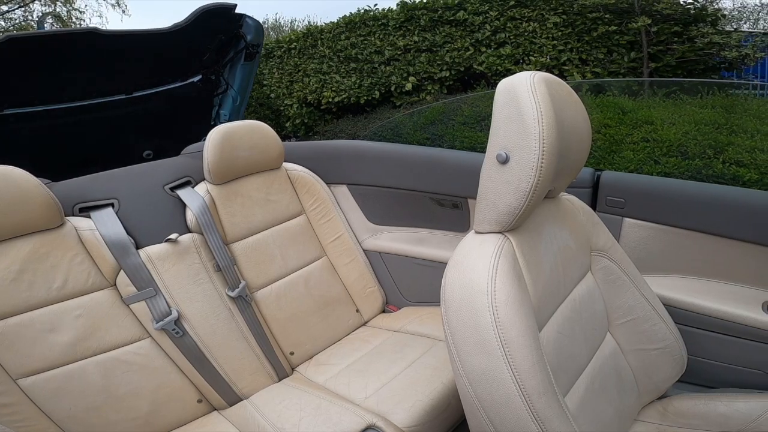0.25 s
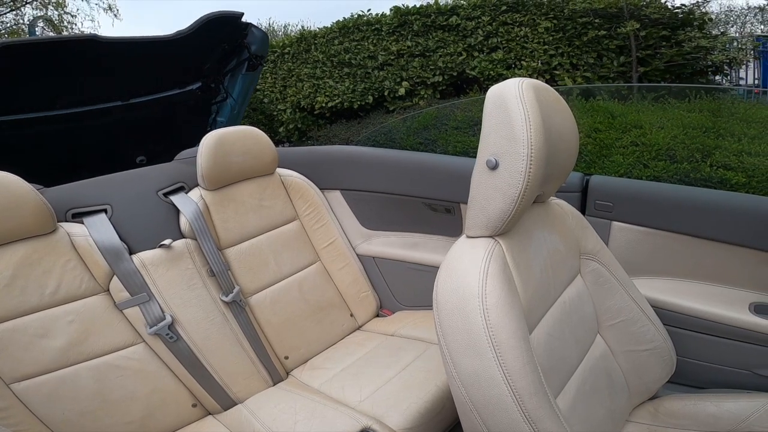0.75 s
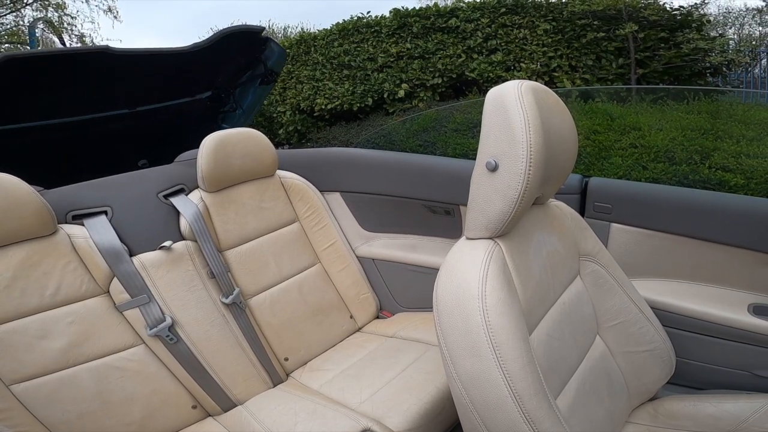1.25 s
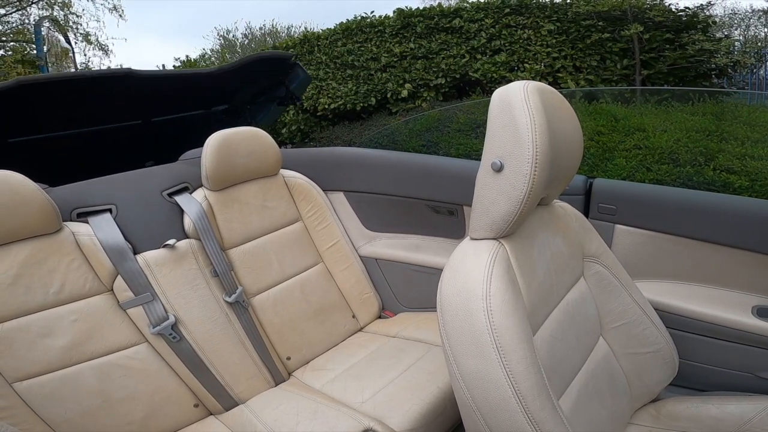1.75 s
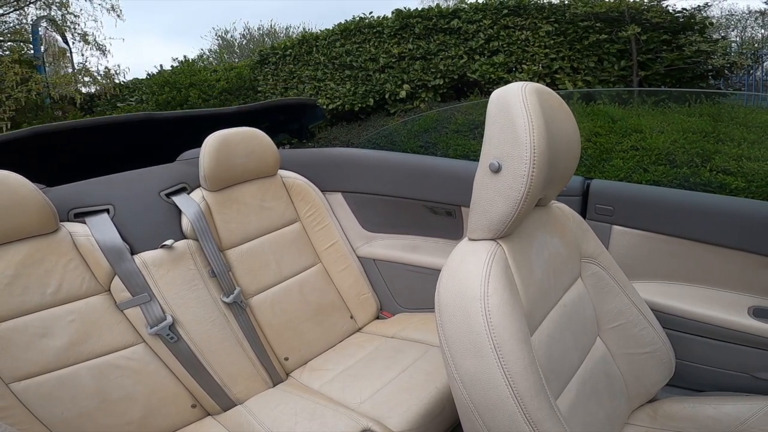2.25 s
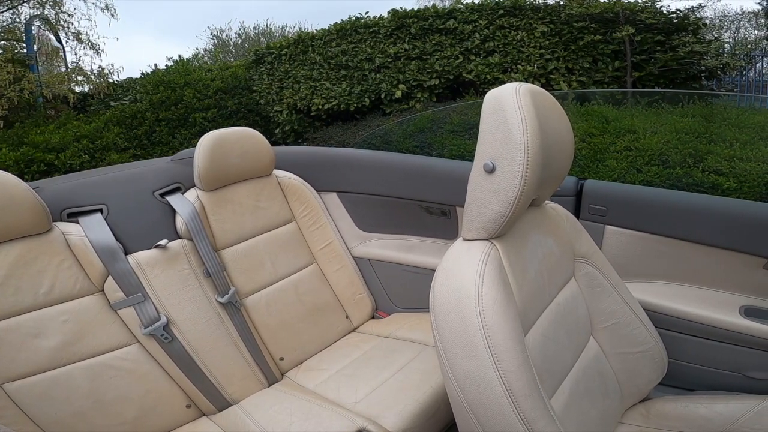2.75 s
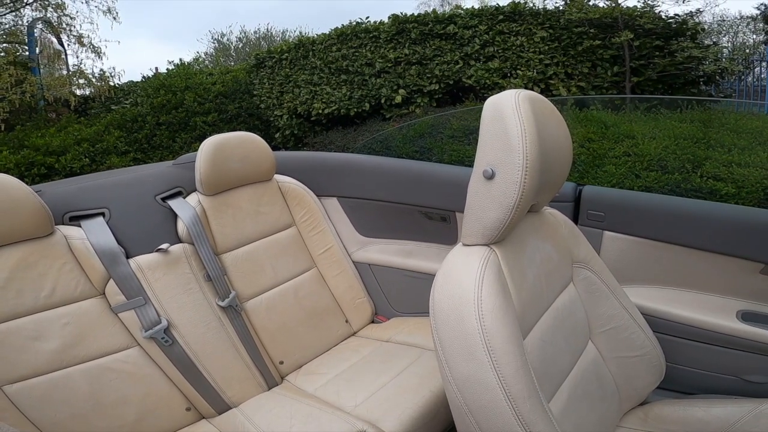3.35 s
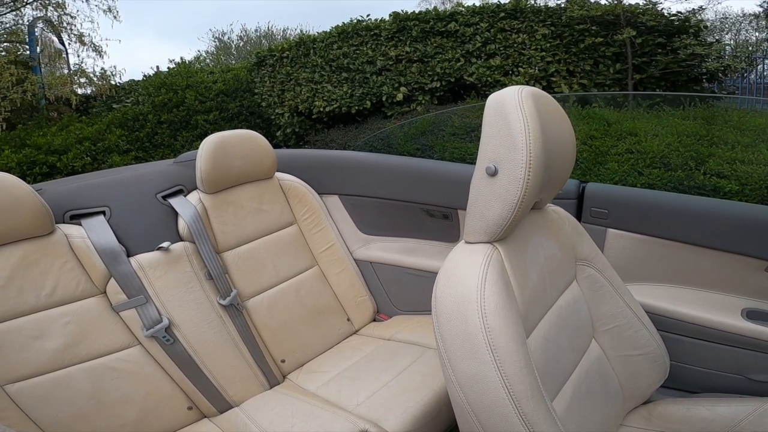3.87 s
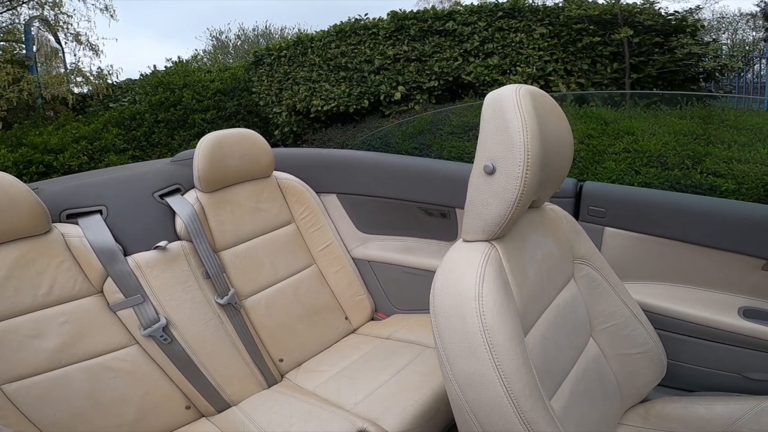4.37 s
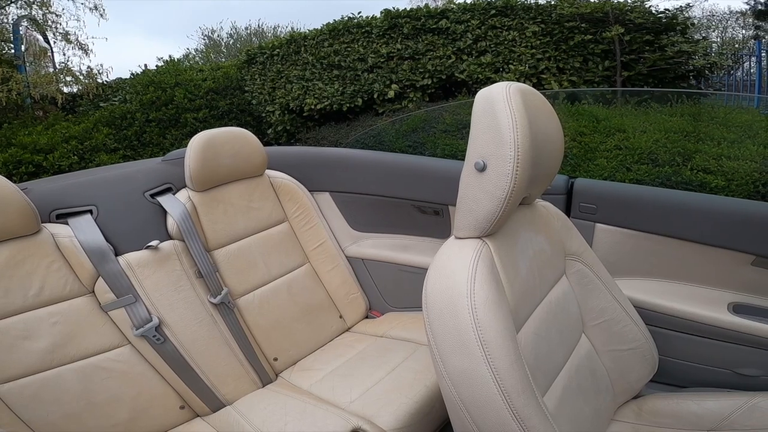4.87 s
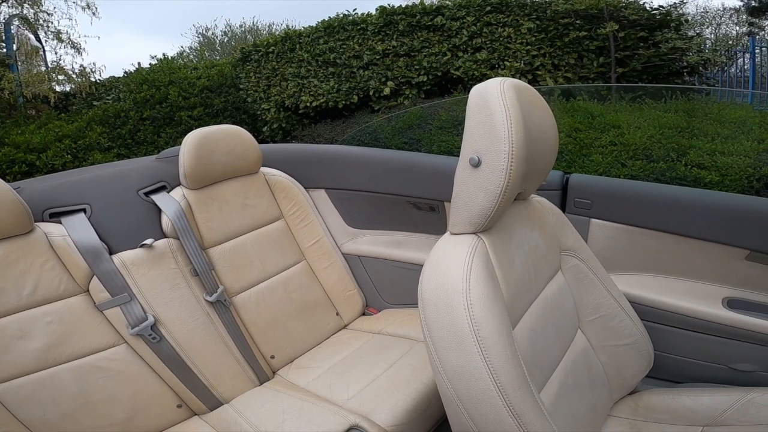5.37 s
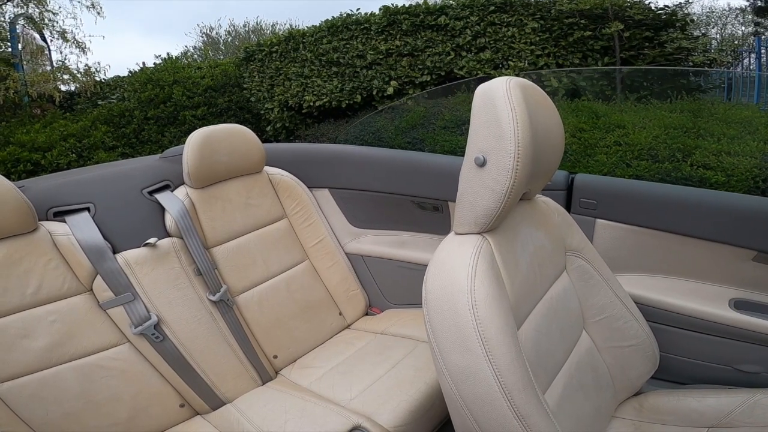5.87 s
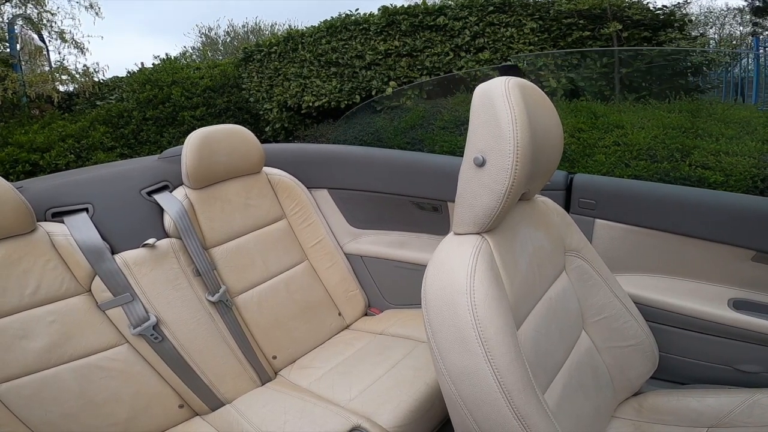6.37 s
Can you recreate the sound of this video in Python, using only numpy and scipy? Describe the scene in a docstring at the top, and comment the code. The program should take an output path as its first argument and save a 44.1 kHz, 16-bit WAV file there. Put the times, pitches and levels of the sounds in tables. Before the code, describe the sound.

A convertible's roof motors whine and hinges creak, the boot lid knocks shut, then a latch clunks and the windows slide up.

```python
"""A convertible closing up

Heard from the front seat, the engine idles while distant traffic fades and birds call faintly.
The roof motors whine and the hinges creak by stick-slip friction as the boot lid sinks; it drops
shut with a double knock, ringing in its modes, and is pulled tight. Then a latch grinds free
with a clunk, and motors slowing under load slide the side glass up in its seals."""
import sys
import numpy as np
from scipy import signal
from scipy.fft import rfft, irfft
from scipy.io import wavfile
from scipy.ndimage import uniform_filter1d

SR = 44100
rng = np.random.default_rng(int(sys.argv[2]) if len(sys.argv) > 2 else 0)


def materialize(psi):
    """Save the field psi as 16-bit PCM at rate SR to the path in sys.argv[1].

    A 1-D psi becomes a single channel; in a 2-D psi each row is a channel.
    """
    bounded = np.clip(np.atleast_2d(psi).T, -1, 1)
    quanta = np.round(bounded * 32767).astype(np.int16)
    wavfile.write(sys.argv[1], SR, quanta)


N = 292030
TIME = np.arange(N) / SR


def gain_of(db):
    """Amplitude ratio of a level in decibels."""
    return 10 ** (np.asarray(db) / 20)


def unit_rms(x):
    """Normalisation to rms 1."""
    return x / np.sqrt(np.mean(x ** 2) + 1e-20)


def spectrum_at(points, hz):
    """Interpolation on a log-frequency axis."""
    f, value = np.transpose(points)
    return np.interp(np.log(hz + 1), np.log(f + 1), value)


def add(mix, s, sound):
    """Superposition: a sound joins the mix at s seconds."""
    part = mix[..., max(round(s * SR), 0):][..., :sound.shape[-1]]
    part += sound[..., :part.shape[-1]]


def wander(rate_hz):
    """Slow random fluctuation: low-passed noise of rms 1."""
    hz = np.fft.rfftfreq(N, 1 / SR)
    return unit_rms(irfft(rfft(rng.standard_normal(N)) * np.exp(-(hz / rate_hz) ** 2), N))


def swelling(sound, rise_s):
    """Exponential build-up, as when a surface starts to slip."""
    return sound * (1 - np.exp(-np.arange(sound.shape[-1]) / SR / rise_s))


def edges_db(t, rise_s, fall_s):
    """Trapezoidal envelope: attack, hold and release."""
    return 20 * np.log10(np.clip(np.minimum((t - t[0]) / rise_s, (t[-1] - t) / fall_s), .01, 1))


# likeness of left and right for far and near sources (frequency [Hz], correlation [ratio])
SAME_FAR = [(60, 0.99), (250, 0.97), (500, 0.83), (1000, 0.79), (2000, 0.5), (4000, 0.057), (8000, 0.21),
            (12000, 0.81)]
SAME_NEAR = [(60, 0.92), (250, 0.97), (500, 0.96), (1000, .78), (2000, 0.16), (4000, 0.2), (8000, 0.2),
             (12000, .8)]
# left minus right (frequency [Hz], level [dB])
LEAN_FAR = [(60, -0.5), (400, -0.5), (1100, 0), (2000, 2.5), (5000, -1), (10000, -5.5)]
LEAN_NEAR = [(60, 0), (300, 0), (1000, 1), (2200, 4), (4500, -2.5), (10000, -2.5)]
def stereo(a, b, hz, far=False):
    """Partial coherence: two independent spectra mix into a partly alike left and right."""
    same, lean = (SAME_FAR, LEAN_FAR) if far else (SAME_NEAR, LEAN_NEAR)
    correlation = np.clip(spectrum_at(same, hz), -1, 1)
    mid, side = np.sqrt((1 + correlation) / 2) * a, np.sqrt((1 - correlation) / 2) * b
    tilt = gain_of(spectrum_at(lean, hz) / 2)
    return np.array([(mid + side) * tilt, (mid - side) / tilt])


def noise(colour, patchy_db, size, far=False):
    """Shaped stereo noise of rms 1, with drifting patches in time and frequency."""
    hz = np.fft.rfftfreq(size, 1 / SR)
    a, b, c, d, patches = rng.standard_normal((5, N * 4 // size + 5, len(hz)))
    patches = unit_rms(uniform_filter1d(uniform_filter1d(patches, size=7, axis=0), size=12, axis=1))
    shape = gain_of(spectrum_at(colour, hz) + patchy_db * patches)
    frames = stereo(a + 1j * b, c + 1j * d, hz, far) * shape
    _, wave = signal.istft(frames.swapaxes(1, 2), nperseg=size, noverlap=size * 3 // 4)
    return unit_rms(wave[:, :N])


def tone(rows, jitter, flutter_db, rate_hz, orders=((1, 0),)):
    """Randomly modulated partials along rows of (time [s], frequency [Hz], level [dB])."""
    times, pitches, levels = np.transpose(rows)
    out, t = np.zeros(N), np.arange(times[0], times[-1], 1 / SR)
    hz, db = np.interp(t, times, pitches), np.interp(t, times, levels)
    knots = rng.standard_normal((2, 4096))
    speed, flutter = (np.interp((t - t[0]) * rate_hz, np.arange(len(k)), k) for k in knots)
    turns = np.cumsum(hz * (1 + jitter * speed)) / SR
    wave = sum(gain_of(d) * np.sin(2 * np.pi * (k * turns + rng.random())) for k, d in orders)
    fade = np.clip(np.minimum(t - t[0], t[-1] - t) / .015, 0, 1)
    add(out, t[0], np.sqrt(2) * wave * gain_of(db + flutter_db * flutter) * fade)
    return out


# modes of the rear bodywork (frequency [Hz], level [dB], T60 [s])
PANEL_MODES = [(192, -6, 0.45), (273, 2, 0.15), (371.5, -6.5, 0.22), (498, -6.5, 0.45), (568, -10.5, 0.11),
               (617, -5, 0.38), (702, -9.5, .3), (785, -9.5, 0.4), (934, -2, 0.2), (1115, -3, 0.079),
               (1288, -4.5, 0.27), (1540, -3, 0.055), (1944, -3, .15), (2106, 1, 0.09), (2570, -4, 0.46),
               (3060, -6, 0.18), (4100, -3.5, 0.08), (4650, -5, 0.14)]
def strike(colour, t60, ring_db, tail_db, tail_t60, push_db=0, pitch=1, contact_s=.0001, size=16384):
    """Impact response: first contact, a dense burst, panel modes and scattering round the cabin."""
    t, hz = np.arange(size) / SR, np.fft.rfftfreq(size, 1 / SR)
    envelope = gain_of(-60 * t / t60) + gain_of(tail_db - 60 * t / tail_t60)
    burst = rng.standard_normal((2, size)) * envelope
    burst[0, 0] += gain_of(push_db)  # the first contact reaches both sides alike
    phases = rng.uniform(0, 2 * np.pi, (len(PANEL_MODES), 2, 1))
    ring = sum(gain_of(db - 60 * t / decay) * np.sin(2 * np.pi * f * t + phase)
               for (f, db, decay), phase in zip(PANEL_MODES, phases))
    spectrum = stereo(*rfft(burst + gain_of(ring_db) * ring), hz)
    spectrum /= np.sqrt(uniform_filter1d(np.mean(abs(spectrum) ** 2, 0), size=120))  # level broad bands
    log_gain = np.log(gain_of(spectrum_at(colour, abs(np.fft.fftfreq(size, 1 / SR)) / pitch)))
    causal = np.exp(np.conj(signal.hilbert(log_gain)))[:len(hz)]  # nothing sounds before the blow
    hit = irfft(spectrum * causal) * np.minimum(2 * (1 - t / t[-1]), 1) ** 4
    hit *= np.tanh(t / contact_s) ** 2  # soft contacts take a moment to build
    return hit / np.sqrt(np.sum(hit ** 2) / (2 * .01 * SR))  # the energy of 10 ms at rms 1


def knocks(rows, modes, contact_s):
    """Modal excitation: each knock rings the same modes, favouring those near its centre frequency."""
    out, t = np.zeros((2, N)), np.arange(SR // 4) / SR
    hz = np.fft.rfftfreq(len(t), 1 / SR)
    f, db, t60 = np.transpose(modes)[..., None]
    for s, level_db, centre_hz, rolloff in rows:
        mode_db = level_db + db - rolloff * abs(np.log2(f / centre_hz))
        envelope = gain_of(mode_db - 60 * t / t60) * np.tanh(t / contact_s)
        direct = (envelope * np.sin(2 * np.pi * f * t)).sum(0)
        scattered = (envelope * np.sin(2 * np.pi * (f * t + rng.random(f.shape)))).sum(0)
        add(out, s, irfft(stereo(rfft(direct), rfft(scattered), hz)))
    return out


# harmonics of the idle (multiple of the firing rate [ratio], level [dB])
IDLE_ORDERS = [(1, 0), (2, -16), (3, -19), (4, -21.5), (5, -26)]
# envelopes of the idle and of the exhaust of a vehicle moving off (time [s], level [dB])
IDLE_LEVEL = [(0, -53.5), (1.5, -40), (6.62, -38.5)]
DRONE_LEVEL = [(0, -32), (.45, -31), (.75, -36), (1.65, -40.5), (2, -49.5), (2.6, -58)]
def engines(firing_hz=33.48, drone_hz=43, sag_hz_per_s=1.352):
    """Beating: the idle's firing tone interferes with a fading exhaust drone close to it in pitch."""
    idle = tone([(s, firing_hz, db) for s, db in IDLE_LEVEL],
                jitter=.014, flutter_db=1.5, rate_hz=13, orders=IDLE_ORDERS)
    drone = tone([(s, drone_hz - sag_hz_per_s * s, db) for s, db in DRONE_LEVEL],
                 jitter=.0045, flutter_db=3, rate_hz=9.6, orders=[(1, -1.5), (2, -29), (3, -25)])
    return (idle + drone) * gain_of([[-.4], [.4]])


# spectrum of still air and the car's rumble (frequency [Hz], density level [dB])
AIR_SPECTRUM = [(12, -21.5), (28, -8), (48, 2), (62, -8.5), (100, -11.5), (180, -15), (300, -25.5),
                (450, -29.5), (720, -37.5), (1100, -39), (2000, -46), (3500, -66.5), (6500, -69),
                (10000, -88.5)]
def air():
    """Ambient noise: a low rumble that wavers slightly in level."""
    level = gain_of(-45 + .81 * wander(rate_hz=9.4))
    return level * noise(AIR_SPECTRUM, patchy_db=1, size=4096, far=True)


# spectrum of distant tyres (frequency [Hz], density level [dB])
TYRE_SPECTRUM = [(60, -1.5), (120, 12.5), (200, 4), (290, 5), (480, -0.5), (720, -4.5), (1000, 1),
                 (1600, -6), (2250, -12.5), (2900, -17.5), (4300, -24.5), (5500, -30), (7500, -36.5),
                 (10000, -57.5), (13000, -60.5)]
def traffic(nearest_s=.9, half_power_s=1.33, drop_s=4.38, drop_db=-2.5):
    """Inverse-square law: passing tyre noise fades with distance; later its level also steps down."""
    passing_db = -50.5 - 10 * np.log10(1 + ((TIME - nearest_s) / half_power_s) ** 2)
    step_db = drop_db * (1 + np.tanh((TIME - drop_s) / .06)) / 2
    level = gain_of(passing_db + step_db + .49 * wander(rate_hz=4.6))
    return level * noise(TYRE_SPECTRUM, patchy_db=1.4, size=1024, far=True)


# whine of the roof pump (time [s], frequency [Hz], level [dB])
PUMP_WHINE = [(0, 445.6, -59.5), (.45, 434, -61.5), (.9, 423, -67), (1.25, 422.5, -56.5),
              (1.65, 412.6, -55), (2.95, 401.2, -64), (3.6, 346, -74)]
# its harmonics (multiple [ratio], level [dB])
PUMP_ORDERS = [(1, -1.5), (2, -19), (5, -21.5)]
# further faint whines and hums, some from the pump itself (start [s], end [s], first pitch [Hz], last pitch
# [Hz], level [dB], fade [dB/s])
FAINT_WHINES = [(0, 1.147, 409, 406, -60.5, -1.5), (1.498, 2.699, 731, 706, -74.5, -4.5),
                (2.78, 3.2, 150.2, 137.8, -46, 16), (3.1, 5.55, 483.7, 475.5, -66.5, 4.5),
                (3.553, 5.603, 641, 630.6, -69.5, -0.5), (3.601, 5.599, 559.6, 552.5, -74.5, -1.5),
                (0, 0.647, 2195, 2178, -75.5, 2), (0, 0.702, 966, 960, -66.5, -1.5),
                (3.699, 5.55, 954, 950, -79.5, 0.5)]
def roof_motors(settling_power=1.368):
    """Pitch follows shaft speed: the pump slows under load, and the fainter whines sink and settle."""
    out = tone(PUMP_WHINE, jitter=.004, flutter_db=1.1, rate_hz=35, orders=PUMP_ORDERS)
    for start, end, first_hz, last_hz, db, fade in FAINT_WHINES:
        t = np.linspace(start, end, 200)
        hz = last_hz + (first_hz - last_hz) * np.linspace(1, 0, len(t)) ** settling_power
        level = db - fade * (t - start) + edges_db(t, rise_s=.1, fall_s=.1)
        out += tone(np.c_[t, hz, level], jitter=.005, flutter_db=2, rate_hz=35,
                    orders=[(1, -1), (2, -23)])
    return out


# spectrum of a rub (frequency [Hz], level [dB])
RUB_SPECTRUM = [(200, -3.5), (1000, 5), (1550, 11), (2400, -0.5), (3250, 4), (3900, -2), (4900, -5),
                (8000, -20.5), (11000, -41)]
def rub(rise_s, pitch):
    """Frictional slip: a burst that swells briefly before it dies."""
    burst = strike(RUB_SPECTRUM, t60=.09, ring_db=-24.5, tail_db=-18, tail_t60=.13, pitch=pitch)
    return swelling(burst, rise_s)


# spells of rustling (start [s], end [s], rub rate [1/s], base level [dB], fade [dB/s])
RUSTLES = [(0, 1.6, 45, -64, 2.5), (5.8, 6, 25, -74, -8)]
def rustle(spots=6, spread_db=5.5):
    """Poisson process: moving hinges and seals give tiny rubs at random instants."""
    out = np.zeros((2, N))
    for start, end, per_s, db, fade in RUSTLES:
        age = np.arange(0, end - start, 1 / SR)
        for chance, size in rng.random((spots, 2, N))[..., :len(age)]:
            slips = (spots * chance < per_s / SR) * gain_of(db - fade * age + spread_db * size)
            add(out, start, signal.oaconvolve(slips[None], rub(rise_s=.018, pitch=1.25), axes=1))
    return out


# creaks of hinges and seals (time [s], rub level [dB], rub pitch [ratio], swell [s],
# ring level [dB], ring pitch [Hz], snap level [dB])
CREAKS = [(0.016, -50.5, 1.13, 0.0013, -65, 4240, -79), (.252, -63, 1.3, 0.0053, -73.5, 3800, -77),
          (0.506, -57, 0.65, .004, -64, 4100, -76), (.722, -54, 1.1, .008, -58, 3700, -71),
          (0.891, -54, .85, .003, -68, 2890, -70), (1.003, -53, 0.84, 0.0017, -53.5, 3250, -68),
          (1.0306, -61, .98, .001, -66, 3400, -78), (1.0862, -53, 0.86, .002, -66, 2670, -72),
          (1.176, -56, .8, .002, -57.5, 2960, -84), (1.2057, -54.5, 0.73, .002, -60, 3127, -80),
          (1.3736, -55.5, 0.78, .001, -61, 2920, -77), (1.52, -59, 0.87, .001, -59, 3080, -73.5),
          (1.9432, -65, 0.93, .001, -74, 4750, -75), (2.3053, -58, 0.76, 0.0018, -77, 2979, -75),
          (2.624, -65, .93, .001, -63, 2920, -80), (2.805, -63, 1, .02, -76, 3000, -62),
          (3.289, -61.5, 0.73, .001, -69, 3400, -86), (3.565, -68, 0.78, 0.0029, -70.5, 3130, -90),
          (4.359, -68, 0.64, .001, -84, 3900, -83)]
# spectrum of a slipping joint's snap (frequency [Hz], level [dB])
SNAP_SPECTRUM = [(500, -8.5), (3000, -5.5), (5000, 2.5), (7000, -6), (9000, -21), (12000, -42)]
# modes of a steel link (multiple of the ring pitch [ratio], level [dB], T60 [s])
LINK_MODES = [(.46, -2, 0.12), (1, 2.5, 0.054), (1.09, -6.5, .05), (1.62, -11.5, 0.035)]
def creaks():
    """Stick-slip friction: a joint rubs, snaps free and sets a steel link ringing."""
    out, t = np.zeros((2, N)), np.arange(SR // 4) / SR
    for s, rub_db, pitch, swell_s, ring_db, ring_hz, snap_db in CREAKS:
        add(out, s, gain_of(rub_db) * rub(swell_s, pitch))
        snap = strike(SNAP_SPECTRUM, t60=.051, ring_db=-41.5, tail_db=-15, tail_t60=.12)
        add(out, s, gain_of(snap_db) * swelling(snap, swell_s))
        for ratio, mode_db, t60 in LINK_MODES:
            phase = 2 * np.pi * (ring_hz * ratio * t + rng.random((2, 1)))
            add(out, s, swelling(gain_of(ring_db + mode_db - 60 * t / t60) * np.sin(phase), swell_s))
    return out


# jolts of the hinge arms (time [s], level [dB], centre [Hz], roll-off [dB/octave])
ARM_KNOCKS = [(.508, -52, 1100, 8), (.724, -50, 1500, 4), (.897, -52, 1800, 4), (1.003, -52, 950, 5),
              (1.088, -52, 700, 4), (1.376, -55, 1700, 6)]
# modes of an arm (frequency [Hz], level [dB], T60 [s])
ARM_MODES = [(696, -5, .08), (853, -1, 0.079), (978, 0.5, .11), (1265, -3.5, 0.071), (1644, -1.5, .15),
             (2150, -9.5, .06)]
def hinge_arms():
    """Free vibration: the arms ring after each jolt of the sinking lid."""
    return knocks(ARM_KNOCKS, ARM_MODES, contact_s=.003)


# course of a squeal (time [s], frequency [Hz], squeal level [dB], rough rub level [dB])
SQUEAL = [(1.33, 1932, -78, -71), (1.445, 1976, -74, -71), (1.465, 2006, -66, -68), (1.525, 2045, -65, -68),
          (1.548, 2080, -70, -74), (1.59, 2093, -61, -76), (1.635, 2130, -64, -73), (1.662, 2150, -76, -79)]
def hinge_squeal():
    """Self-excited vibration: a hinge rubs, catches and squeals, rising as it is pushed harder."""
    squeal = tone([(s, hz, db) for s, hz, db, _ in SQUEAL], jitter=.011, flutter_db=2, rate_hz=200)
    rough = tone([(s, hz, db) for s, hz, _, db in SQUEAL], jitter=.045, flutter_db=4, rate_hz=450)
    return squeal + rough


# blows of lid, latches and the rising side glass (time [s], thud level [dB], thud pitch [ratio], clack level
# [dB], # clack pitch [ratio], tick level [dB])
BLOWS = [(2.7118, -46.5, 1.43, -60, 0.82, -56.5), (2.7159, -45, 1.1, -59, 0.66, -79),
         (2.726, -34.5, 0.9, -56, 0.83, -63), (2.7708, -42, 1.1, -60, 0.58, -76),
         (2.7785, -43, 0.85, -54, .62, -85), (2.802, -41, 0.55, -68, .6, -74),
         (2.8289, -45.5, 0.68, -85, 1, -67), (3.005, -45.5, 0.55, -74, .8, -90),
         (3.136, -40.5, 0.6, -56, 0.62, -76), (5.5714, -38.5, 1.14, -48.5, 0.93, -76),
         (5.5925, -38.5, 0.9, -53, 1.2, -67), (5.612, -40, .62, -68, 0.96, -82),
         (6.411, -50.5, 1.25, -66, 0.79, -72), (6.4222, -54, 1.4, -59, 0.56, -68),
         (6.4541, -50, 0.9, -56, 0.89, -67)]
# spectra of the three parts of a blow (frequency [Hz], level [dB])
THUD_SPECTRUM = [(60, -23), (130, -23.5), (200, 6.5), (280, 3.5), (480, -2), (750, -11.5), (1200, -14.5),
                 (2000, -44.5), (4000, -43.5), (9000, -75), (13000, -89)]
CLACK_SPECTRUM = [(200, -19), (700, 11.5), (1400, 0.5), (2100, 10), (3000, -1.5), (4500, -5), (6500, -27),
                  (9000, -42), (13000, -54.5), (20000, -84)]
TICK_SPECTRUM = [(500, 6.5), (2000, -8), (3500, 2), (5000, -1.5), (8000, -9.5), (10000, -25), (13000, -41)]
def body_blows():
    """Impact radiation: struck bodywork gives a dull thud, a hard clack and a sharp tick."""
    out = np.zeros((2, N))
    for s, thud_db, thud_pitch, clack_db, clack_pitch, tick_db in BLOWS:
        thud = strike(THUD_SPECTRUM, t60=.05, ring_db=-21.5, tail_db=-12.5, tail_t60=.26,
                      push_db=22.5, pitch=thud_pitch, contact_s=.00061)
        clack = strike(CLACK_SPECTRUM, t60=.045, ring_db=-18, tail_db=-31, tail_t60=.16,
                       push_db=8, pitch=clack_pitch)
        tick = strike(TICK_SPECTRUM, t60=.014, ring_db=-39, tail_db=-8, tail_t60=.1)
        add(out, s, gain_of(thud_db) * thud + gain_of(clack_db) * clack + gain_of(tick_db) * tick)
    return out


# landings of the boot lid (time [s], level [dB], centre [Hz], roll-off [dB/octave])
LID_KNOCKS = [(2.7119, -31, 1400, 2), (2.7275, -38, 1500, 5), (2.7708, -32, 420, 0.5),
              (2.7805, -32.5, 230, 10)]
# modes of the lid (frequency [Hz], level [dB], T60 [s])
LID_MODES = [(210.5, -0.5, .07), (286, -1, 0.05), (332, -5.5, 0.045), (434, -1.5, 0.094), (618, -20, .1),
             (790, -14.5, .1), (917, -10, 0.074), (1080, -21, 0.056), (1230, -21, .04), (1483, -19, .09),
             (1550, -19, 0.087)]
def boot_lid():
    """Panel resonance: the lid rings hollowly as it lands, rattles and drops home."""
    return knocks(LID_KNOCKS, LID_MODES, contact_s=.0012)


# heavy blows (time [s], level [dB])
HEAVES = [(2.799, -25), (5.585, -26)]
# modes of the body on its springs (frequency [Hz], level [dB], T60 [s])
BODY_MODES = [(41.1, 0.5, 0.46), (76.2, -9, 0.23), (105.4, -9, 0.32), (130.7, -14.5, 0.4)]
def body_heave():
    """Damped mass-spring oscillation: the body sways and booms after a heavy blow."""
    out, t = np.zeros(N), np.arange(SR // 2) / SR
    sway = sum(gain_of(db - 60 * t / t60) * np.sin(2 * np.pi * hz * t) for hz, db, t60 in BODY_MODES)
    for s, db in HEAVES:
        add(out, s, gain_of(db) * swelling(sway, rise_s=.014))
    return out


# calls (start [s], length [s], nominal pitch [Hz], nominal glide [Hz], level [dB], warble [ratio])
BIRD_CALLS = [(3.937, 0.34, 2735, 90, -76.5, .028), (4.19, .2, 2780, -200, -81.5, .055),
              (4.69, 0.23, 5540, 605, -87, .035), (5.037, .14, 5830, 350, -88, .035),
              (5.235, .08, 7400, 79.5, -90, .04)]
def birds(detune=.979, echo_t60=.22, direct_db=-12, echo_db=-3.5):
    """Diffuse reflection: far gliding whistles arrive mostly as echoes from hedge and trees."""
    calls, t = np.zeros(N), np.arange(SR // 3) / SR
    progress = np.linspace(.01, .99, 50)
    arch_db = 10 * np.log10(np.sin(np.pi * progress))
    for start, length, hz, glide_hz, db, warble in BIRD_CALLS:
        rows = np.c_[start + length * progress, hz + glide_hz * progress, db + arch_db]
        calls += tone(rows, jitter=warble, flutter_db=3, rate_hz=450, orders=[(detune, 0)])
    scatter = unit_rms(rng.standard_normal((2, len(t))) * gain_of(-60 * t / echo_t60)) / np.sqrt(len(t))
    echoes = signal.oaconvolve(calls[None], scatter, axes=1)[:, :N]
    return gain_of(direct_db) * calls + gain_of(echo_db) * echoes


# spectrum of glass rubbing in its seals (frequency [Hz], density level [dB])
SLIDE_SPECTRUM = [(40, 15), (100, 8.5), (200, 1.5), (400, 7), (520, 0), (700, 1), (870, 2), (1350, -0.5),
                  (1900, -7), (2800, -7.5), (4300, -12), (6000, -20), (7800, -23), (10000, -37),
                  (12500, -42)]
def glass_slide(start_s=5.52, seal_s=6.36, seal_width_s=.15, seal_db=3.5):
    """Sliding friction: the glass hisses, rubbing harder for a moment as it meets the top seal."""
    slide_db = -57.5 + seal_db * np.exp(-((TIME - seal_s) / seal_width_s) ** 2)
    moving = np.clip((TIME - start_s) / .019, 0, 1)
    level = moving * gain_of(slide_db + .54 * wander(rate_hz=49))
    return level * noise(SLIDE_SPECTRUM, patchy_db=.95, size=1024)


# modes of the latch hook (frequency [Hz], level [dB], T60 [s])
HOOK_MODES = [(1050, -7.5, 0.081), (1490, -8.5, 0.046), (1962, -1, 0.059), (2136, 1, 0.045),
              (2184, -2, 0.05), (2580, -9, 0.042), (2860, -9.5, 0.053), (3960, -15, 0.045),
              (4500, -20, .04)]
def latch(spring_s=5.532, spring_hz=3940, spring_t60=.022, hook_s=5.5915, left_db=9.5):
    """Damped ringing: the spring pings as the latch lets go, then the hook cracks against its stop."""
    out, t = np.zeros((2, N)), np.arange(SR // 5) / SR
    ping = gain_of(-55.5 - 60 * t / spring_t60) * np.sin(2 * np.pi * spring_hz * t)
    add(out, spring_s, np.tanh(t / .001) * ping)
    pan = gain_of([[left_db / 2], [-left_db / 2]])
    for hz, db, t60 in HOOK_MODES:
        phase = 2 * np.pi * (hz * t + rng.random() + .41 * rng.random((2, 1)))
        envelope = gain_of(-36.5 + db - 60 * t / t60) * np.tanh(t / .0006)
        add(out, hook_s, pan * envelope * np.sin(phase))
    return out


# drags of the latch (start [s], peak [s], level [dB], rise [dB/s], fall [dB/s], pitch [ratio])
GRINDS = [(5.54, 5.576, -42, 230, 450, 0.68), (5.541, 5.601, -43, 270, 560, 1.54),
          (5.61, 5.621, -44.5, 600, 270, 0.51)]
# spectrum of the grinding (frequency [Hz], density level [dB])
GRIND_SPECTRUM = [(150, -12), (400, -2), (900, 0), (1500, -3), (2200, -9.5), (3200, -17), (5000, -36),
                  (9000, -62)]
def latch_grind(slips_per_s=3000):
    """Shot noise: dense tiny slips build up and die away as the latch drags free."""
    out, t = np.zeros((2, N)), np.arange(SR // 4) / SR
    hz = np.fft.rfftfreq(len(t), 1 / SR)
    for start, peak_s, db, rise, fall, pitch in GRINDS:
        slips = rng.standard_normal((2, len(t))) * (rng.random(len(t)) < slips_per_s / SR)
        spectrum = stereo(*rfft(slips), hz) * gain_of(spectrum_at(GRIND_SPECTRUM, hz / pitch))
        past_peak = start + t - peak_s
        envelope = gain_of(db + np.minimum(rise * past_peak, -fall * past_peak))
        add(out, start, swelling(unit_rms(irfft(spectrum, len(t))) * envelope, rise_s=.0024))
    return out


# jumps of the bolt (time [s], level [dB], centre [Hz], roll-off [dB/octave])
BOLT_KNOCKS = [(5.5579, -28.5, 580, 11.5), (5.5716, -31, 300, 4), (5.6165, -33, 650, 6)]
# modes of the latch housing (frequency [Hz], level [dB], T60 [s])
HOUSING_MODES = [(278, -0.5, 0.13), (376, -4, 0.12), (413, 1, 0.074), (555, -7, .12), (620, -4, 0.064),
                 (695, -14, 0.11), (802, -19, .15), (914, -13, .1), (1067, -16, .15), (1256, -18, .12)]
def latch_bolt():
    """Impulsive excitation: the jumping bolt draws a clunk from its housing."""
    return knocks(BOLT_KNOCKS, HOUSING_MODES, contact_s=.00068)


# two motors (start [s], free shaft rate [Hz], loaded shaft rate [Hz], time of half load [s], level [dB])
WINDOW_MOTORS = [(5.64, 73, 60.1, 6.14, -63.5), (5.78, 78.2, 64.3, 6.08, -66)]
# their harmonics (multiple of the shaft rate [ratio], level [dB])
WINDOW_ORDERS = [(4, -7.5), (6, -4.5), (10, -6), (18, -14.5), (20, -14.5), (21, -20.5)]
def window_motors(end_s=6.62, load_s=.115, door_hz=1280, door_half_width_hz=66, door_db=3.5):
    """Forced resonance: the motors slow under load, sweeping whines through the door panel's peak."""
    out = np.zeros(N)
    for start, free_hz, loaded_hz, half_s, db in WINDOW_MOTORS:
        t = np.linspace(start, end_s, 200)
        shaft_hz = loaded_hz + (free_hz - loaded_hz) / (1 + np.exp((t - half_s) / load_s))
        level = db + edges_db(t, rise_s=.06, fall_s=.23)
        for order, order_db in WINDOW_ORDERS:  # each whine wavers on its own
            hz = order * shaft_hz
            lift_db = door_db / (1 + ((hz - door_hz) / door_half_width_hz) ** 2)
            out += tone(np.c_[t, hz, level + order_db + lift_db], jitter=.013, flutter_db=3.5, rate_hz=60)
    return out


# bump into the top seal (time [s], level [dB], centre [Hz], roll-off [dB/octave])
GLASS_KNOCKS = [(6.4505, -48.5, 1250, 3)]
# modes of the side glass in its frame (frequency [Hz], level [dB], T60 [s])
GLASS_MODES = [(254, 5, .09), (620, 2, 0.094), (854, -2, .09), (1020, 0, 0.091), (1230, -2, .08),
               (1490, 0.5, .07), (1800, -6, .05)]
def glass_bump():
    """Plate vibration: the pane rings briefly after a soft contact with its top seal."""
    return knocks(GLASS_KNOCKS, GLASS_MODES, contact_s=.003)


def scene():
    """Superposition of all sources at the front seat."""
    background = engines() + air() + traffic()
    drives = roof_motors() + glass_slide() + window_motors()
    impacts = body_blows() + body_heave() + latch()
    hinges = creaks() + rustle() + hinge_squeal()
    return (background + drives + impacts + hinges + birds()
            + hinge_arms() + boot_lid() + latch_bolt() + glass_bump() + latch_grind())


def record(dry):
    """Band limiting: a low-pass filter removes the highest treble."""
    lowpass = signal.firwin(255, cutoff=12800, window=("kaiser", 8), fs=SR)
    return signal.oaconvolve(dry, lowpass[None], "same")


dry = scene()
out = record(dry)
materialize(out)
```